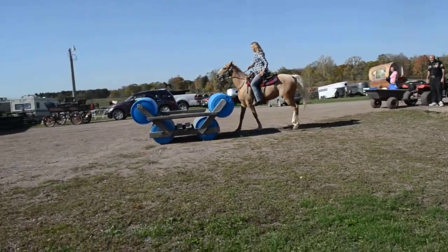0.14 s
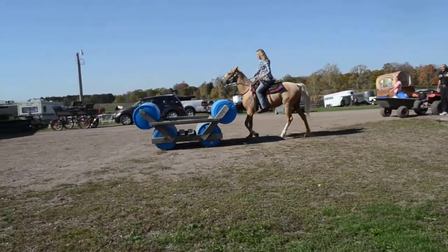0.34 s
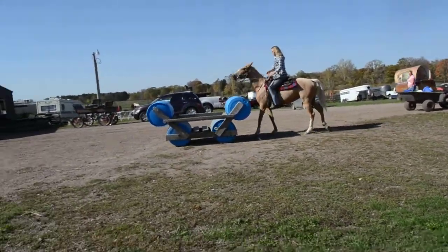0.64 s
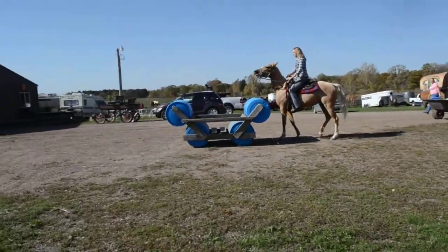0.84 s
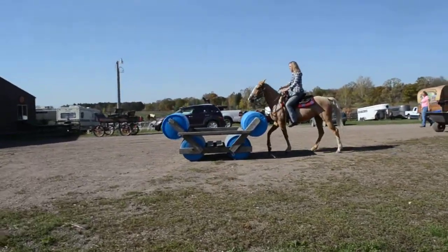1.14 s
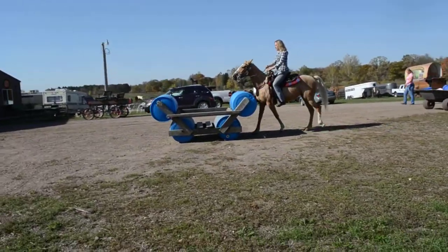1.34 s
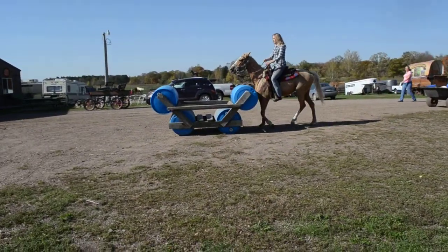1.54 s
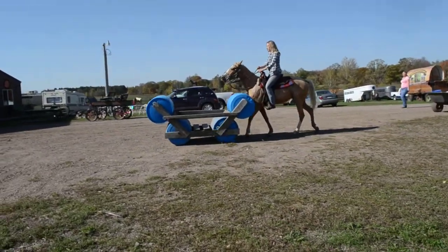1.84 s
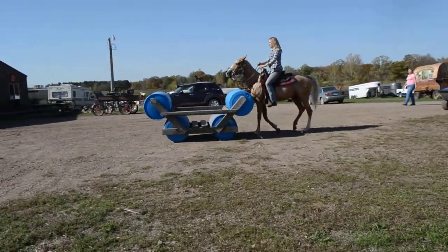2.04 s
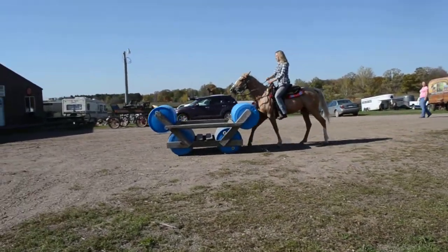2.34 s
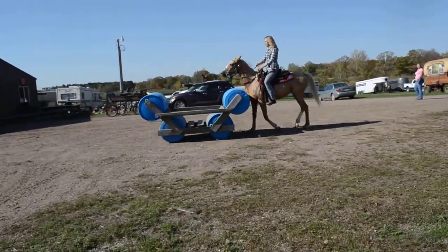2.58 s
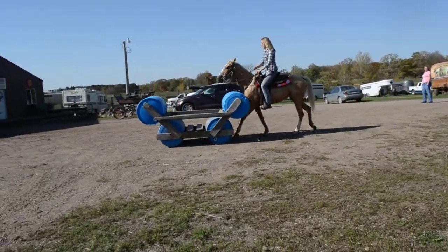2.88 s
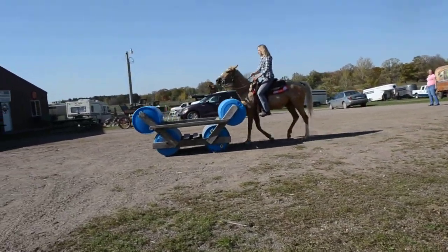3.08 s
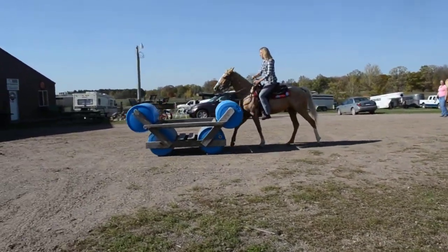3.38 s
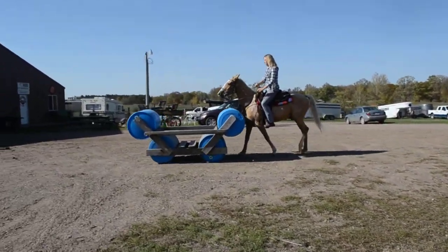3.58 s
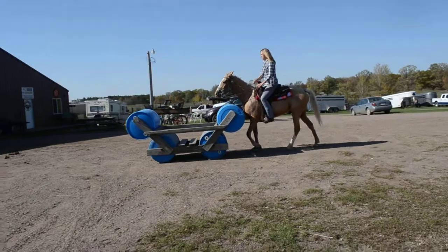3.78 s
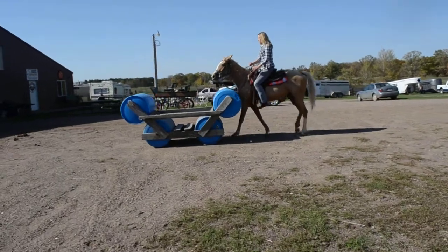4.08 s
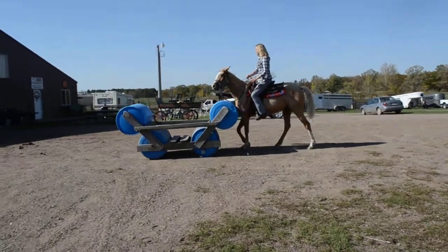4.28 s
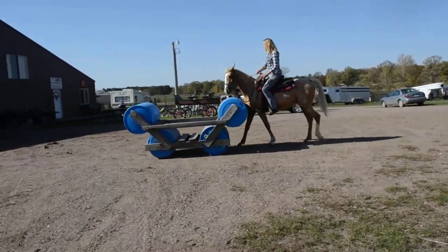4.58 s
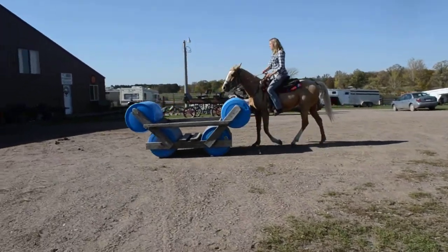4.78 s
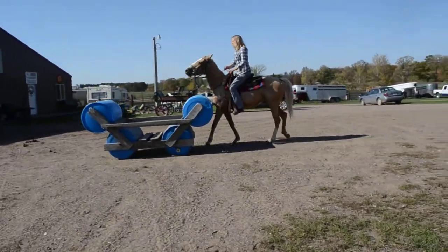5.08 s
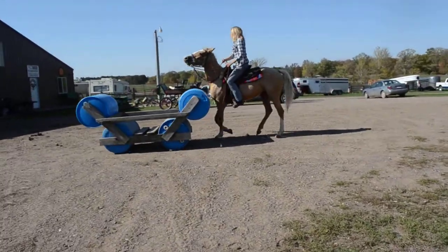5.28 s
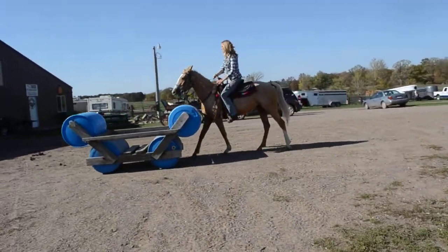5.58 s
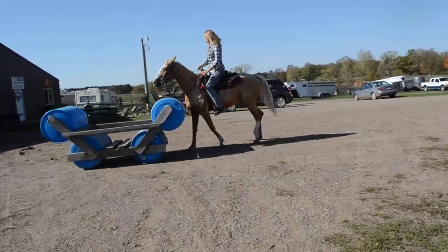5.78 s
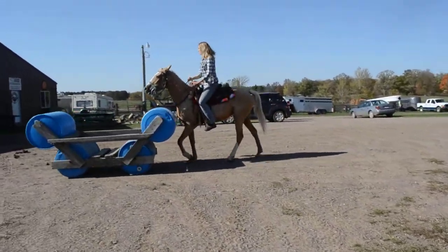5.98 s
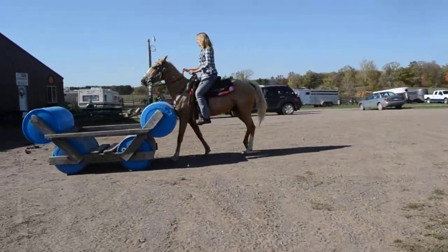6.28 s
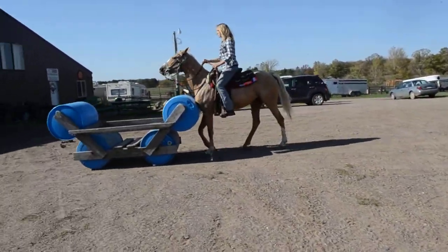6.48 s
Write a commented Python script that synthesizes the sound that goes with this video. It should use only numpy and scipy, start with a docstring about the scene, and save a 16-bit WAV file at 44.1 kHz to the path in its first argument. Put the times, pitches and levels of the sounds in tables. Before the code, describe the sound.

Hollow barrels rumble and clunk over a gravel lot, shoved along by a walking horse, amid crunching grit, sharp knocks and low gusty wind thumps.

```python
"""Hollow plastic barrels under a wooden frame, pushed by a horse across a gravel lot toward the microphone.
Random stone contacts, filtered by the shells, drum on the rolling barrels; loud rolling adds a wall boom.
Filtered clicks and noise make the grit crunching under barrels and hooves, with cracking chips;
short damped blows make the hard knocks. A gusty breeze of filtered noise and single eddies buffets
the microphone, over faint open air and the thin whine of the camera's electronics."""
import sys
import numpy as np
from scipy import signal
from scipy.fft import rfft, irfft
from scipy.io import wavfile
from scipy.ndimage import uniform_filter1d

SR = 44100
rng = np.random.default_rng(int(sys.argv[2]) if len(sys.argv) > 2 else 0)


def transcribe(u):
    """Save the signal u as a 16-bit wav file named by the first command-line argument.

    u: samples, shape (n,) or (channels, n), limited to [-1, 1]; the rate is SR.
    q: integer samples, one column per channel.
    """
    v = np.clip(np.atleast_2d(u).T, -1, 1)
    q = np.round(v * 32767).astype(np.int16)
    wavfile.write(sys.argv[1], SR, q)


N = 292383
TIME = np.arange(N) / SR  # seconds

# Roll of the barrels as the horse shoves and the frame slows, before lulls: (time [s], drumming level [dB])
ROLL_LEVEL = [(0.0, -37.5), (0.35, -33.5), (0.78, -40), (1.06, -45.5), (1.16, -35.5), (1.32, -40.5),
              (1.68, -41), (1.85, -35), (2.2, -31), (2.45, -34.5), (2.87, -35.5), (3.21, -28), (3.42, -31),
              (3.57, -35), (4.42, -31.5), (5.2, -36.5), (5.74, -38.5), (5.9, -35), (6.63, -35)]
# Colour of the drumming shells: (frequency [Hz], relative level [dB])
BARREL_COLOUR = [(100, -27), (220, -4.5), (400, -10), (560, -0.5), (715, 4.5), (820, 0), (1050, -1.5),
                 (1300, -4.5), (1750, -9.5), (2350, -20.5), (3300, -27), (5200, -47), (15000, -100)]
# Weight lands on the gravel, a hoof or a lurching barrel:
# (time [s], drumming level [dB], crunch level [dB])
LANDINGS = [(0.003, -30, -50), (0.105, -25.5, -47.5), (0.708, -25, -55), (1.088, -26.5, -72),
            (1.184, -42, -53.5), (1.453, -31, -62), (1.917, -34, -48.5), (2.548, -25.5, -50),
            (2.681, -26.5, -63), (2.989, -22.5, -46), (3.15, -24, -73), (3.205, -22.5, -60),
            (3.317, -17, -54), (3.429, -23.5, -43.5), (3.834, -30.5, -47), (4.297, -26, -64),
            (4.428, -26.5, -55), (4.67, -30, -51), (4.802, -29, -64), (4.969, -29.5, -46),
            (5.519, -24, -60), (5.868, -24.5, -51.5), (6.021, -32.5, -49), (6.181, -29, -50),
            (6.24, -30.5, -46.5), (6.57, -23.5, -44)]
# Middles of the moments when the load eases between shoves: (time [s])
LULL_TIMES = [0.6, 1.03, 1.32, 1.43, 1.66, 2.41, 2.755, 3.73, 4.885, 5.32, 5.735]
LULL_DB, LULL_HALF_S = -7, 0.033  # drop of the grit; the drumming drops by half as many dB
# Colour of the grinding grit: (frequency [Hz], relative level [dB])
GRIT_COLOUR = [(600, -13), (1500, -10.5), (3000, 16), (4100, 10), (5300, -1), (7300, 4.5), (8300, -0.5),
               (11500, 1.5), (13000, -9.5), (15000, -24)]
# Loose grit shoved along in a soft swell: (time [s], rise of the grit [dB])
SCRAPE_SWELLS = [(0.28, 9), (1.84, 2), (2.14, 3), (3.8, 2.5), (5.17, 2.5), (5.41, 8), (5.53, 9.5)]
SCRAPE_HALF_S = 0.034
GRIT_DB, GRIT_GROWTH = -35.5, 0.71  # grit at a roll of 0 dB, before swells and lulls; dB per dB of roll
NEARING_DB_PER_S = 0.5  # the grit grows louder as the distance to the microphone shrinks
# Chips of gravel cracking under the load: (time [s], peak level [dB], upper edge of the colour [Hz])
CHIP_CRACKS = [(0.343, -34, 4000), (0.361, -28.5, 4460), (0.4325, -31.5, 3160), (0.7466, -29.5, 4180),
               (1.385, -29.5, 2960), (1.624, -33.5, 5500), (2.5743, -29.5, 9000), (3.897, -34, 8150),
               (4.997, -33, 5140), (6.038, -25.5, 3900)]
# Colour of a cracking chip: (multiple of its upper edge [ratio], relative level [dB])
CHIP_COLOUR = [(.15, 2.5), (1, 1), (2, -12), (5, -26)]
# Hard knocks of stones, hooves and frame:
# (time [s], level of the blow [dB], tick relative to the blow [dB], pitch [Hz])
KNOCK_EVENTS = [(0.1775, -9.5, -18.5, 895), (0.727, -13, -13.5, 1020), (1.078, -15.5, -19, 840),
                (1.0885, -5.5, -28, 860), (1.1035, -16.5, -42, 644), (1.731, -11.5, -14, 690),
                (1.92, -13.5, -24, 860), (2.2862, -8, -13, 1030), (2.543, -13, -20, 930),
                (2.677, -16.5, -43, 600), (2.926, -14.5, -16, 915), (2.985, -17, -13, 750),
                (3.17, -11.5, -33, 890), (3.211, -17, -10, 1080), (3.229, -11.5, -14, 990),
                (3.3245, -11, -8, 640), (3.765, -16, -10, 836), (3.8383, -11.5, -10, 850),
                (4.486, -14.5, -21, 970), (4.823, -13.5, -20, 880), (4.969, -15, -5.5, 930),
                (5.456, -13, -34, 885), (5.899, -12.5, -38, 705), (6.1178, -12, -26, 860),
                (6.1276, -5.5, -6, 1170), (6.136, -3.5, -5.5, 790), (6.148, -11.5, -8.5, 655),
                (6.423, -9.5, -31, 815), (6.588, -16, -8, 1220)]
# Colour of the sharp tick, before a small random change per knock: (frequency [Hz], relative level [dB])
TICK_COLOUR = [(300, -30), (1500, 28.5), (4200, 3.5), (12000, -8.5), (15800, -28)]
# Hollow ring of a barrel, before each knock's detuning and stretching:
# (frequency [Hz], relative level [dB], decay by 60 dB [s])
SHELL_MODES = [(535, -6, 0.25), (615, -5, 0.37), (650, 6.5, 0.096), (814, -1.5, 0.19), (1100, -6, 0.29),
               (1280, -1, 0.12)]
# Breeze at the microphone between gusts, with one lull: (time [s], level [dB])
BREEZE_LEVEL = [(0.0, -35), (0.7, -33.5), (1.04, -52.5), (1.5, -33.5), (2.05, -41.5), (3.4, -34.5),
                (6.63, -36)]
# Colour of the breeze on the microphone: (frequency [Hz], relative level [dB])
BREEZE_COLOUR = [(15, -34), (35, -13.5), (60, -4.5), (130, 3.5), (190, 0.5), (450, -14.5), (800, -44),
                 (2000, -67)]
# Gusts that swell and drop at the microphone: (start [s], length [s], level at the height [dB])
GUSTS = [(0.076, 0.16, -28.5), (0.35, 0.14, -28), (1.454, 0.077, -32), (2.118, 0.4, -29),
         (2.543, 0.34, -27.5), (3.084, 0.44, -25), (5.819, 0.23, -26), (6.026, 0.061, -30.5),
         (6.394, 0.098, -24)]
GUST_SKEW = 0.68  # exponent; under 1, a gust builds faster than it drops
# Single eddies that thump the microphone: (middle [s], level [dB], pitch at the middle [Hz])
EDDY_THUMPS = [(0.101, -14, 267), (0.392, -34, 156), (0.422, -13, 238), (0.457, -16, 444),
               (0.777, -22, 159), (1.321, -26, 121), (1.337, -29, 220), (1.491, -22, 146),
               (1.526, -24, 230), (1.578, -20.5, 220), (1.603, -18, 272), (1.637, -23.5, 377),
               (1.662, -22, 268), (1.703, -17, 272), (1.72, -11.5, 253), (1.73, -8, 273), (3.188, -16, 185),
               (3.319, -15, 443), (3.332, -10.5, 210), (3.349, -12, 197), (4.943, -23, 136),
               (5.753, -21, 153), (5.954, -14, 212), (6.411, -16, 110)]
EDDY_CYCLES, EDDY_RISE = 1.4, 0.17  # half length in cycles; share the pitch rises per half length
EDDY_SKEW = 0.11  # second harmonic that makes the swing lopsided
# Colour of the open air over the lot: (frequency [Hz], relative level [dB])
AIR_COLOUR = [(900, 0.5), (2000, -9), (5000, -32), (15500, -39)]
EDGE_HZ = 15850  # upper limit of the microphone channel


def barrels(clumps):
    """Passing stones drum on hollow shells; under a heavy load the walls boom in a chain of bumps."""
    load = pressure(follow(ROLL_LEVEL) + easing() / 2, axis=1, clumps=clumps, share=0.68,
                    fade_s=0.018, scuff_db=-27, scuff_s=0.018)
    contacts = stones(per_s=1500, spread_db=3.0, largest=3)
    drum = colour(contacts * load, BARREL_COLOUR) / np.std(colour(contacts, BARREL_COLOUR))
    clacks = pebbles(per_s=100, low_hz=610, high_hz=1800, cycles=3.5, spread_db=0.5)
    walls = signal.butter(2, [430, 800], "bandpass", fs=SR, output="sos")
    boom = evened(signal.sosfilt(walls, stones(per_s=250, spread_db=1, largest=2)))
    # the walls take over as the load grows; flex is their share in amplitude
    flex = np.minimum(load / gain_of(-19.5), 0.8)
    shells = drum + gain_of(-12) * load * clacks
    return np.sqrt(1 - flex ** 2) * shells + flex * load * boom


def pressure(level_db, axis, clumps, share, fade_s, scuff_db, scuff_s):
    """Contact strength: clumpy roll, landings and the gravel sliding after them (axis picks the column)."""
    sliding, landings = gain_of(level_db) ** 2, np.zeros(N)
    t = TIME[:SR // 2]
    rise = (1 - np.exp(-t / 0.00062)) ** 2
    for row in LANDINGS:
        power = gain_of(row[axis]) ** 2 * rise
        add(landings, row[0], power * np.exp(-t / fade_s))
        add(sliding, row[0], power * gain_of(scuff_db) ** 2 * np.exp(-t / scuff_s))
    return np.sqrt(landings + sliding * (1 - share + share * clumps))


def easing():
    """How far the load on the gravel drops between shoves, in dB."""
    return bumps([(s, LULL_DB) for s in LULL_TIMES], LULL_HALF_S)


def clumping(per_s, fade_s):
    """Gravel gives way in little collapses that build in a moment and die away; mean power about one."""
    collapses = rng.exponential(1, N) * (rng.random(N) < per_s / SR)
    power = signal.lfilter([1], [1, -np.exp(-1 / (fade_s * SR))], collapses)
    power = abs(uniform_filter1d(power, size=SR // 400))
    # the load is steady, so over a tenth of a second the collapses even out
    steady = uniform_filter1d(power, size=SR // 10)
    return power / (steady + power.mean() / 20)


def stones(per_s, spread_db, largest):
    """Random contacts of either sign: many small, a few large."""
    size = gain_of(spread_db * np.minimum(rng.exponential(1, N), largest))
    return evened(size * rng.choice([-1, 1], N) * (rng.random(N) < per_s / SR))


def pebbles(per_s, low_hz, high_hz, cycles, spread_db, count=24):
    """Separate stones, each clicking at its own pitch: a rounded start and a few dying cycles."""
    t, out = TIME[:1024], np.zeros(N)
    hits = stones(per_s, spread_db, largest=3)
    which = rng.integers(0, count, N)
    for k, hz in enumerate(np.geomspace(low_hz, high_hz, count)):
        envelope = (1 - np.exp(-2 * t * hz)) ** 2 * np.exp(-t * hz / cycles)
        click = envelope * np.sin(2 * np.pi * hz * t)
        out += signal.oaconvolve(hits * (which == k), click * (1 - t / t[-1]))[:N]
    return evened(out)


def grit(clumps):
    """Small stones grind together as dense contacts and noise, and some snap with a bright click."""
    contacts = stones(per_s=900, spread_db=4.2, largest=3.3)
    grind = evened(colour(contacts + gain_of(-3) * rng.standard_normal(N), GRIT_COLOUR))
    clicks = pebbles(per_s=160, low_hz=2000, high_hz=11000, cycles=4, spread_db=4.5)
    level_db = GRIT_DB + GRIT_GROWTH * follow(ROLL_LEVEL)
    level_db = level_db + NEARING_DB_PER_S * (TIME - TIME.mean())
    level_db = level_db + easing() + bumps(SCRAPE_SWELLS, SCRAPE_HALF_S)
    load = pressure(level_db, axis=2, clumps=clumps, share=0.81,
                    fade_s=0.014, scuff_db=-9.5, scuff_s=0.024)
    return (grind + gain_of(-12.0) * clicks) * load


def snaps(gap_s=0.0018, fade_db=-2.5, burst_s=0.00053, spray=0.18, count=7):
    """A chip gives way in tiny cracks at uneven gaps, each with a short spray of dust."""
    t, out = TIME[:SR // 20], np.zeros(N)
    for s, db, hz in CHIP_CRACKS:
        cracks = np.zeros(len(t))
        gaps = gap_s * rng.exponential(1, count)
        for k, delay in enumerate(np.cumsum(gaps) - gaps[0]):
            dust = spray * rng.standard_normal(len(t)) * np.exp(-t / burst_s)
            add(cracks, delay, gain_of(fade_db * k) * ((t == 0) + dust))
        sound = colour(cracks, [(hz * multiple, level) for multiple, level in CHIP_COLOUR])
        add(out, s, gain_of(db) * sound / abs(sound).max())
    return out


def knocks():
    """Stones, hooves and frame strike hard, each blow at its own pitch and sharpness."""
    out = np.zeros(N)
    for s, db, tick_db, hz in KNOCK_EVENTS:
        add(out, s, gain_of(db) * knock(hz, tick_db))
    return out


def knock(hz, tick_db, damping=0.45, ring_db=-50, scatter_db=-23, scatter_t60=0.13):
    """A quickly damped blow sets the shell ringing and scatters from the lot; a sharp tick rides on top of the
    blow."""
    t = TIME[:SR // 2]
    u = t * hz / damping  # damping in cycles
    blow = -u * np.exp(1 - u) * np.sin(2 * np.pi * hz * t)
    chips = 0.15 * rng.standard_normal(len(t)) * np.exp(-t / 0.0017)
    tick = colour((t == 0) + chips, [(f, db + 2 * rng.standard_normal()) for f, db in TICK_COLOUR])
    tick = gain_of(tick_db) * tick / abs(tick).max()
    hollow = gain_of(-0.4 * (tick_db + 21.5))  # a dull blow rings the shell longer than a sharp one
    shell = np.zeros(len(t))
    for f, db, t60 in SHELL_MODES:
        mode_hz = f * (1 + 0.018 * rng.standard_normal())
        shell += gain_of(db - 60 * t / (t60 * hollow)) * np.sin(2 * np.pi * mode_hz * t)
    ring = signal.fftconvolve(blow, shell)[:len(t)]
    scatter = evened(signal.fftconvolve(blow, rng.standard_normal(len(t)))[:len(t)])
    scatter = scatter * gain_of(-60 * t / (scatter_t60 * hollow))
    return rattle(blow + tick) + gain_of(ring_db) * ring + hollow * gain_of(scatter_db) * scatter


def rattle(contact, rebound_db=-15, gap_s=0.003, count=2):
    """A loose stone strikes again at uneven gaps, weaker each time."""
    out = contact.copy()
    for k, delay in enumerate(np.cumsum(gap_s * rng.uniform(0.51, 1.7, count))):
        add(out, delay, gain_of(rebound_db * (k + 0.5)) * contact)
    return out


def wind():
    """Lumpy turbulence at the microphone, with higher flutter in strong gusts and lopsided eddies."""
    gust = airflow() * gain_of(2.0 * wander(hz=28.5))
    band = signal.butter(2, [240, 520], "bandpass", fs=SR, output="sos")
    flutter = evened(signal.sosfilt(band, rng.standard_normal(N)))
    flutter = flutter * np.minimum(gust / gain_of(-21.0), 1)
    rumble = evened(colour(rng.standard_normal(N), BREEZE_COLOUR))
    return gust * (rumble + gain_of(-10.5) * flutter) + eddies()


def airflow():
    """Strength of the wind: the power of the breeze plus one arch for each gust."""
    power = gain_of(follow(BREEZE_LEVEL)) ** 2
    for start, length, db in GUSTS:
        age = np.clip((TIME - start) / length, 0, 1)
        power += (gain_of(db) * np.sin(np.pi * age ** GUST_SKEW)) ** 2
    return np.sqrt(power)


def eddies():
    """Each eddy thumps the microphone in a short, lopsided swing of rising, unsteady pitch."""
    out = np.zeros(N)
    wobble = 0.67 * wander(hz=220)  # radians
    for s, db, hz in EDDY_THUMPS:
        length = EDDY_CYCLES / hz
        near = abs(TIME - s) < 4 * length
        t = TIME[near] - s
        cycles = hz * t * (1 + EDDY_RISE * t / length / 2)
        turn = 2 * np.pi * (cycles + rng.random()) + wobble[near]
        swing = np.cos(turn) + EDDY_SKEW * np.cos(2 * turn)
        out[near] += gain_of(db) * np.exp(-(t / length) ** 2) * swing
    return out


def background(air_db=-46.5, whine_db=-87, whine_hz=15707):
    """Open air over the lot as filtered noise, and the camera electronics' whine as a sine."""
    air = evened(colour(rng.standard_normal(N), AIR_COLOUR))
    whine = evened(np.sin(2 * np.pi * whine_hz * TIME))
    return gain_of(air_db) * air + gain_of(whine_db) * whine


def gain_of(db):
    """Decibels to amplitude."""
    return 10 ** (np.asarray(db) / 20)


def evened(x):
    """Scales to an rms of one."""
    return x / np.sqrt(np.mean(x ** 2) + 1e-20)


def follow(table):
    """A curve at every sample, straight between the table's points."""
    return np.interp(TIME, *np.transpose(table))


def bumps(rows, half_s):
    """A curve in dB with one smooth bump for each (time [s], level [dB]) row."""
    return sum(db * np.exp(-((TIME - s) / half_s) ** 2) for s, db in rows)


def wander(hz):
    """Slow random drift of rms one, with little left above hz."""
    keep = np.exp(-(np.fft.rfftfreq(N, 1 / SR) / hz) ** 2)
    return evened(irfft(rfft(rng.standard_normal(N)) * keep, N))


def add(mix, s, sound):
    """Lays a sound into the mix at time s."""
    part = mix[max(round(s * SR), 0):][:len(sound)]
    part += sound[:len(part)]


def colour(x, points, size=4096):
    """Causal minimum-phase filter with the given spectrum, so that clicks keep their sharp start."""
    hz, db = np.transpose(points)
    log_hz = np.log(np.fft.rfftfreq(size, 1 / SR) + 1)
    log_gain = np.log(gain_of(np.interp(log_hz, np.log(hz), db)))
    full = np.concatenate([log_gain, log_gain[-2:0:-1]])
    taps = np.fft.ifft(np.exp(np.conj(signal.hilbert(full)))).real[:size // 2]
    return signal.oaconvolve(x, taps)[:len(x)]


def scene():
    """Barrels and grit meet the same collapses of gravel; the grit has finer ones of its own too."""
    clumps = clumping(per_s=55, fade_s=0.01)
    fine = clumping(per_s=71, fade_s=0.002)
    gravel = barrels(clumps) + grit((clumps + fine) / 2) + snaps()
    return (gravel + knocks() + wind() + background())[None]


def record(dry):
    """The camera's microphone channel cuts off the highest treble."""
    low_pass = signal.firwin(1023, EDGE_HZ, window=("kaiser", 9), fs=SR)
    return signal.oaconvolve(dry, low_pass[None], "same")


dry = scene()
out = record(dry)
transcribe(out)
```